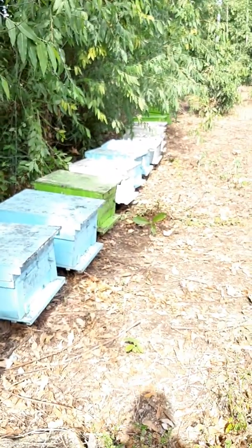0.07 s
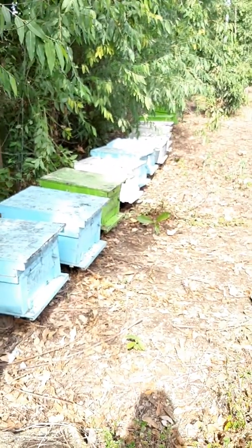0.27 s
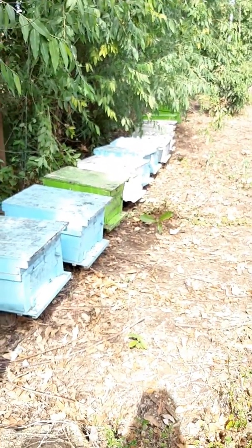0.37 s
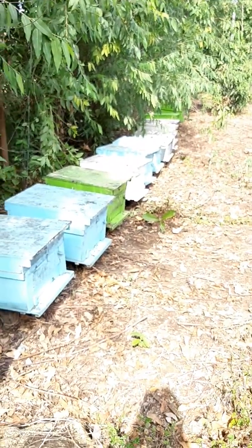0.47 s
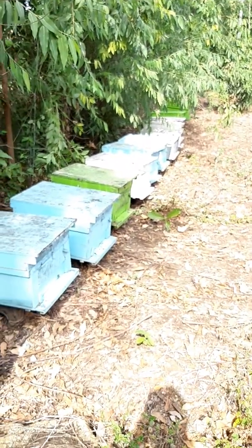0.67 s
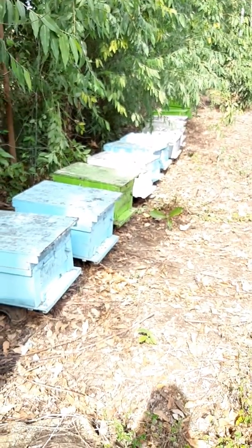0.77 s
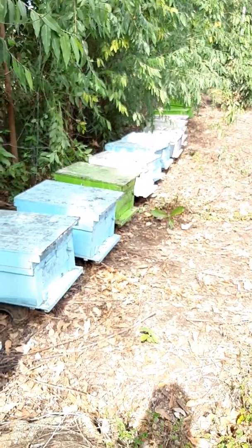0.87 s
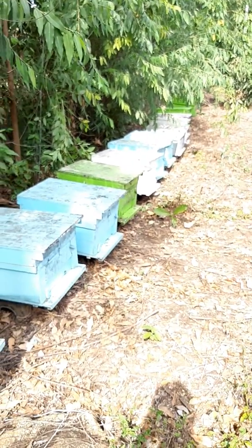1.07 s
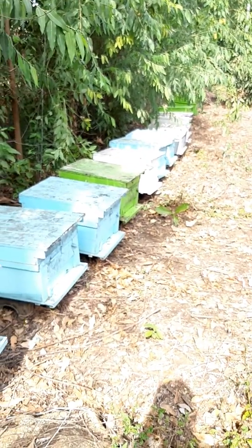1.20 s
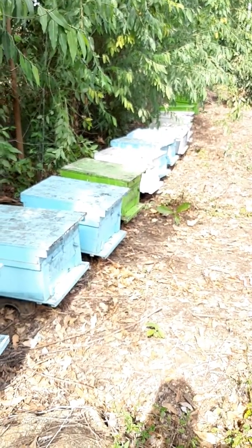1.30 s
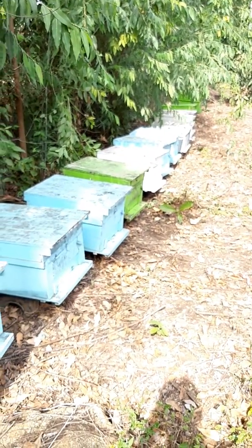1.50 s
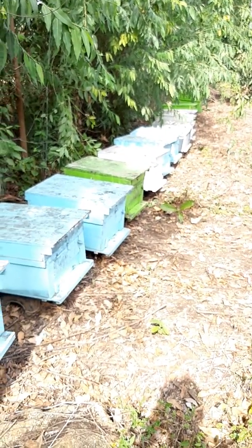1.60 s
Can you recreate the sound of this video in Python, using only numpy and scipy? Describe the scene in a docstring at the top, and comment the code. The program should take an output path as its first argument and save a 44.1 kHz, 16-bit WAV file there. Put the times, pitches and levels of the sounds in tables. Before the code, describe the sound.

Close to the microphone, a shoe scuffs through dry leaves with a short swelling rasp, tiny squeak and dull thump; leaves tick and settle, then faint bees hum over soft outdoor tree hiss.

```python
"""A scuff through dry leaves beside beehives

Something, probably a shoe, scuffs through dry leaves close to the microphone: dense random grains make
a swelling rasp, a wobbling sine makes the brief squeak, damped low modes make the dull thump that ends it.
Noise bursts tick and crackle as the leaves settle. Many bees, built from wingbeat harmonics, hum on
over the faint filtered-noise hiss of the trees, and now and then one bee flies nearer."""
import sys
import numpy as np
from scipy import signal
from scipy.fft import rfft, irfft
from scipy.io import wavfile
from scipy.ndimage import map_coordinates

SR = 44100
rng = np.random.default_rng(int(sys.argv[2]) if len(sys.argv) > 2 else 0)


def file_out(sig):
    """Save sig as 16-bit WAV at sys.argv[1]."""
    # one column per channel
    cols = np.atleast_2d(sig).T
    # limit, then scale
    lim = np.clip(cols, -1, 1)
    pcm = np.round(lim * 32767).astype(np.int16)
    wavfile.write(sys.argv[1], SR, pcm)


N = 72765

# Stereo placing: the left port hears each sound later by the lag; a negative pan is louder on the right
GROUND_LAG_S, GROUND_PAN_DB = 0.0002584, -2
AIR_LAG_S = 0.00029
COHERENT_HZ = 950  # well above this, diffuse sound is unrelated at the two ports


def undb(db):
    """Decibels to gain."""
    return 10 ** (np.asarray(db) / 20)


def unit(x):
    """Scale to rms 1."""
    return x / np.sqrt(np.mean(x ** 2))


def clock():
    """Time of every sample in seconds."""
    return np.arange(N) / SR


def bins():
    """Frequency of every spectral bin in Hz, at least 1."""
    return np.maximum(np.arange(N // 2 + 1) * SR / N, 1)


def decay(age, t60):
    """Exponential fade that has lost 60 dB after t60 seconds."""
    return np.exp(-np.log(1000) * age / t60)


def curve(rows):
    """Gain over time from (t/s, level/dB) points."""
    return undb(np.interp(clock(), *np.array(rows).T))


def colour(x, points):
    """Shape a spectrum by (f/Hz, level per Hz/dB) points, then scale to rms 1."""
    hz, db = np.array(points).T
    gain = undb(np.interp(np.log(bins()), np.log(hz), db))
    return unit(irfft(rfft(x) * gain, N))


def walk(rate):
    """Smooth random drift through `rate` knots per second, with a spread near 1."""
    knots = rng.standard_normal(1024)
    return map_coordinates(knots, [clock() * rate + 8], order=3, mode="wrap")


def ports(x, lag_s, pan_db):
    """Two microphone ports: the left hears the sound delayed by the lag and at its own level."""
    left = irfft(rfft(x) * np.exp(-2j * np.pi * bins() * lag_s), N)
    return np.array([left * undb(pan_db / 2), x * undb(-pan_db / 2)])


def lean(pan_db):
    """Left and right gains that pan an already stereo sound."""
    return undb(np.array([[.5], [-.5]]) * pan_db)


def incoherence():
    """Share of diffuse sound that differs between the ports, rising with frequency."""
    return bins() / np.hypot(bins(), COHERENT_HZ)


def grains(per_s, spread_db):
    """Single-sample clicks at random moments with widely varying strengths."""
    hits = (rng.random(N) < per_s / SR) * rng.standard_normal(N)
    return hits * undb(spread_db * rng.standard_normal(N))


def air():
    """Soft hiss: shared bass, louder on the left; treble unrelated at the ports, leaning right."""
    # colour of air and foliage: f/Hz, level per Hz/dB
    air_colour = [(25, 10), (60, 13.5), (120, 6), (290, 8.5), (450, 16.5), (640, 5), (900, 7), (1500, 3.5),
                  (1900, -2), (2500, -8.5), (3500, -2), (4800, -1.5), (6400, -4.5), (7100, -1), (7700, -8),
                  (8500, -14.5), (12500, -9.5), (16000, -11.5)]
    # rise and fall of the hiss: t/s, level relative to level_db/dB
    hiss = [(0, 2), (.7, 1), (1.05, -0.5), (1.3, 2.5), (1.45, 0), (1.65, 2.5)]
    level_db, treble_pan_db = -57, -3.5  # the pan is reached at 5 kHz and grows beyond
    apart = incoherence()
    shared = rfft(ports(rng.standard_normal(N), AIR_LAG_S, pan_db=5.5)) * np.sqrt(1 - apart ** 2)
    own = rfft(rng.standard_normal((2, N))) * apart
    tilt = lean(treble_pan_db * np.sqrt(bins() / 5000))
    return colour(irfft((shared + own) * tilt, N), air_colour) * undb(level_db) * curve(hiss)


def swarm(count=8):
    """Bees around the hives, each a harmonic buzz with its own drifting wingbeat, level and port lag."""
    # wingbeat harmonics from the first upward: level/dB
    harmonics = [-3, 0.5, -9, -7, -29, -12.5, -10.5, -33]
    # fader of the whole hum: t/s, level/dB
    hum = [(0, -65.5), (.6, -65), (.95, -58), (1.25, -57.5), (1.45, -63), (1.65, -61)]
    wing_hz, pitch_spread, pitch_wander = 208.5, .07, .035  # spread and wander as fractions
    swell_db = 1
    out = np.zeros((2, N))
    for place in np.linspace(-1, 1, count):
        hz = wing_hz * (1 + pitch_spread * place + pitch_wander * walk(7))
        phase = 2 * np.pi * (np.cumsum(hz) / SR + rng.random())
        buzz = sum(undb(db) * np.sin((k + 1) * phase) for k, db in enumerate(harmonics))
        swelling = buzz * undb(swell_db * walk(6.6))
        lag_s = AIR_LAG_S * (1 + 1.2 * rng.standard_normal())
        out += ports(swelling, lag_s, pan_db=-2.3)
    return unit(out) * curve(hum)


def litter():
    """Crackle sparser than the rasp: leaves shift, are pressed down and spring back in short noise bursts."""
    # colour of the shifting leaves: f/Hz, level per Hz/dB
    litter_colour = [(50, -23), (110, 5), (330, 16.5), (700, 6.5), (1200, 7), (2200, 12), (3000, 1.5),
                     (4000, 6), (5600, -21), (7300, -20), (9000, -2), (13000, -15), (16000, -11)]
    # fader before, during and after the slide: t/s, level/dB
    settle = [(0, -53), (.04, -90), (.06, -59.5), (.115, -42), (.15, -44.5), (.28, -66), (.35, -74),
              (.43, -57.5), (.5, -64.5), (.55, -96), (.8, -83), (1.0, -75.5)]
    cracks = grains(per_s=1500, spread_db=4)
    ring = decay(clock()[:1024], t60=0.0044)
    crackle = signal.fftconvolve(np.abs(cracks), ring)[:N] * rng.standard_normal(N)
    return ports(colour(crackle, litter_colour), GROUND_LAG_S, GROUND_PAN_DB) * curve(settle)


def rasp():
    """Dense tiny fractures of leaf and grit in uneven spurts, partly scattered by the surroundings."""
    # colour of the rasp: f/Hz, level per Hz/dB
    rasp_colour = [(50, -34), (120, 7), (300, -4), (500, 2), (680, -8.5), (850, 6.5), (1050, 1.5),
                   (1300, 0), (1750, -1.5), (2000, 2), (2400, -1), (3100, -1), (3600, 0.5), (4100, 1),
                   (4700, 4), (5250, -0.5), (5600, -7), (6200, -0.5), (7500, -0.5), (8300, -8.5),
                   (9200, -11), (12500, -14.5), (16000, -19)]
    # fader of the slide, before flutter: t/s, level/dB
    slide = [(0, -58.5), (.06, -58.5), (.115, -50.5), (.17, -43.5), (.207, -31), (.235, -32.5), (.26, -34),
             (.272, -43.5), (.305, -65), (.38, -70.5)]
    scatter_db, flutter_db, flutter_per_s = 0, 1.3, 150
    fractures = grains(per_s=8200, spread_db=1.5)
    direct = ports(colour(fractures, rasp_colour), GROUND_LAG_S, GROUND_PAN_DB)
    noise = colour(rng.standard_normal((2, N)), rasp_colour)
    scatter = irfft(rfft(noise) * incoherence(), N) * lean(GROUND_PAN_DB)
    flutter = undb(flutter_db * walk(flutter_per_s))
    return (direct + undb(scatter_db) * scatter) * curve(slide) * flutter


def echo(x):
    """A faint, short outdoor echo from hives and trees: a decaying noise tail, different at each port."""
    # colour of the returning sound: f/Hz, level per Hz/dB
    echo_colour = [(100, -20), (700, -14), (1300, -5), (1950, 1.5), (2800, 3), (4500, -7.5), (8000, -6),
                   (16000, -0.5)]
    tail = colour(rng.standard_normal((2, N)), echo_colour) * decay(clock(), t60=0.38)
    tail = tail / np.sqrt(np.sum(tail ** 2, axis=1, keepdims=True))  # unit energy at each port
    return undb(-19.5) * signal.fftconvolve(x, tail, axes=1)[:, :N]


def ticks():
    """Single dry leaves snap: a band of noise starts abruptly and fades within about nine milliseconds."""
    # snaps: t/s, level at onset before panning/dB, centre f/Hz
    snaps = [(.0094, -50, 4860), (0.0266, -45, 9100), (0.0784, -38, 3470), (0.0787, -41, 13400),
             (.085, -43.5, 10100), (0.4062, -51, 10000), (0.415, -42.5, 8800), (0.459, -47, 4720),
             (0.479, -52, 7950), (0.5, -53.5, 11200), (.604, -50, 12500), (0.694, -43.5, 5100),
             (.699, -50, 5500), (.7855, -55, 5200), (.945, -60, 7700), (1.1798, -56, 4260),
             (1.249, -56, 12000)]
    t60_s, width_octaves = 0.0087, 0.68
    out = np.zeros(N)
    for start, db, hz in snaps:
        age = clock() - start
        band = np.exp(-.5 * (np.log2(bins() / hz) / width_octaves) ** 2)
        crack = unit(irfft(rfft(rng.standard_normal(N)) * band, N))
        out += undb(db) * crack * (age >= 0) * decay(np.abs(age), t60_s)
    return ports(out, GROUND_LAG_S, pan_db=-5)


def thumps():
    """Blows on the ground ring low, damped modes and leave a short rumble; a longer contact is duller."""
    # blows: t/s, gain of the modes/dB, contact time/s, gain of the rumble/dB
    blows = [(0.09, -47, 0.003, -68), (.113, -52, 0.0015, -48.5), (0.136, -50, 0.0039, -54),
             (.2150, -5.5, 0.008, -51), (.263, -6.5, 0.00092, -37), (0.2823, -21, 0.0026, -62),
             (.4915, -43.5, .001, -51.5), (1.636, -44, 0.0064, -49)]
    # modes a blow rings with: f/Hz, level relative to the blow/dB, build-up/s, t60/s
    modes = [(152.4, -28, 0.0033, 0.2), (174.4, 6.5, 0.0058, 0.032), (257, 13, 0.005, 0.013),
             (363, 13.5, 0.0058, 0.02), (415.7, 3, 0.013, 0.054), (541, 3.5, 0.013, 0.028),
             (884, -16.5, 0.00059, 0.036)]
    # colour of the dull ground rumble: f/Hz, level per Hz/dB
    rumble_colour = [(40, -20), (130, 6), (280, 1.5), (450, 0), (700, -18), (2000, -24), (5000, -38),
                     (16000, -65)]
    rumble_t60_s = 0.24
    out = np.zeros(N)
    for start, db, contact, rumble_db in blows:
        age = np.maximum(clock() - start, 0)
        ring = np.zeros(N)
        for hz, level, build, t60 in modes:
            envelope = (1 - np.exp(-age / build)) * decay(age, t60)
            ring += undb(level) * envelope * np.sin(2 * np.pi * hz * age)
        # smoothing by the smooth push of the contact takes off the treble
        push = np.sin(np.pi * np.minimum((np.arange(1024) + .5) / (contact * SR), 1)) ** 2
        out += undb(db) * signal.fftconvolve(ring, push / push.sum())[:N]
        fade = (1 - np.exp(-age / contact)) * decay(age, rumble_t60_s)
        out += undb(rumble_db) * fade * colour(rng.standard_normal(N), rumble_colour)
    return ports(out, lag_s=0.00024, pan_db=1.2)


def squeak():
    """The sliding surface sticks and slips at a nearly steady pitch: a wobbling sine just before it stops."""
    start_s, attack_s, hold_s, release_s = 0.2298, .011, .004, .032
    pitch_hz, wobble = 1572, .009  # wobble as a fraction of the pitch
    corners = start_s + np.cumsum([0, attack_s, hold_s, release_s])
    envelope = np.interp(clock(), corners, [0, 1, 1, 0])
    hz = pitch_hz * (1 + wobble * walk(251))
    tone = np.sin(2 * np.pi * np.cumsum(hz) / SR)
    return ports(tone * envelope * undb(-22), GROUND_LAG_S, pan_db=1.5)


def near_bees(count=4):
    """A bee swells out of the hum for a moment, its pitch sagging by Doppler as it goes by."""
    # fly-bys, at the closest point: t/s, wingbeat f/Hz, first harmonic before panning level/dB
    passes = [(.72, 200.3, -63.5), (.885, 208, -59), (1.255, 203.2, -63.5)]
    width_s, doppler, rolloff_db = 0.021, .03, -11  # doppler as a fraction, rolloff per harmonic
    out = np.zeros(N)
    for when, hz, db in passes:
        along = (clock() - when) / width_s
        distance = np.hypot(along, 1)  # 1 at the closest point
        phase = 2 * np.pi * np.cumsum(hz * (1 - doppler * along / distance)) / SR
        buzz = sum(undb(rolloff_db * k) * np.sin((k + 1) * phase) for k in range(count))
        out += undb(db) / distance ** 2 * buzz
    return ports(out, AIR_LAG_S, pan_db=3.0)


def scene():
    """Air, bees and shifting leaves around the scuff, its echo, the thumps and the squeak."""
    background = air() + swarm() + near_bees()
    scuff = rasp()
    return background + litter() + scuff + echo(scuff) + ticks() + thumps() + squeak()


def record(dry):
    """The microphone thins the deep bass below 99 Hz and cuts the top above 15.85 kHz."""
    low_cut = signal.butter(3, 99, "high", fs=SR, output="sos")
    top_cut = signal.ellip(10, .2, 70, 15850, fs=SR, output="sos")
    return signal.sosfilt(top_cut, signal.sosfilt(low_cut, dry))


dry = scene()
out = record(dry)
file_out(out)
```